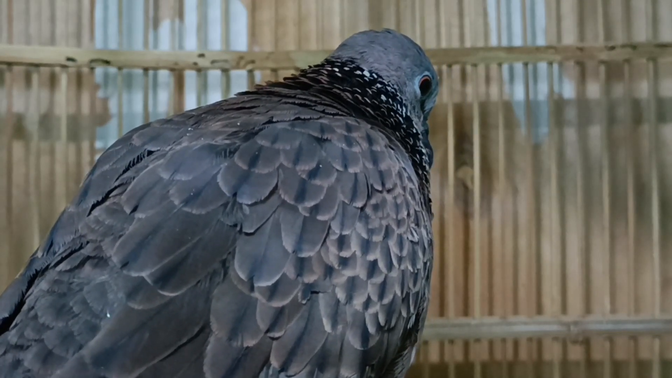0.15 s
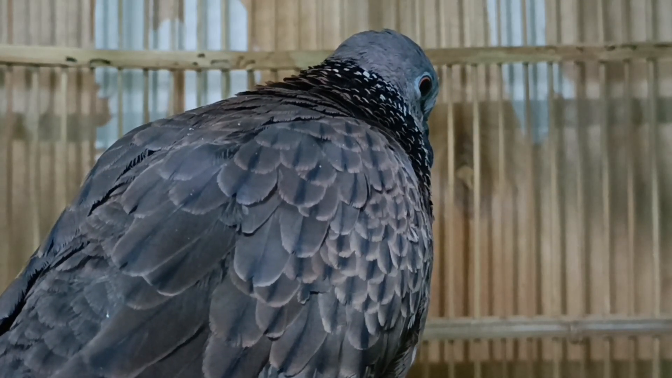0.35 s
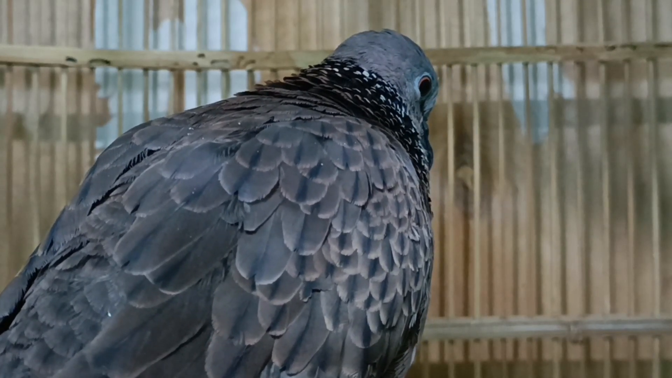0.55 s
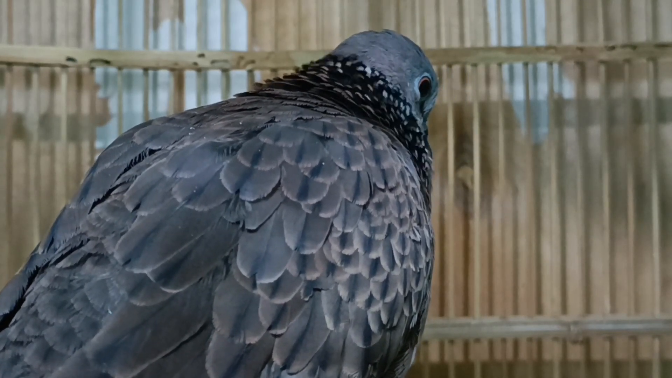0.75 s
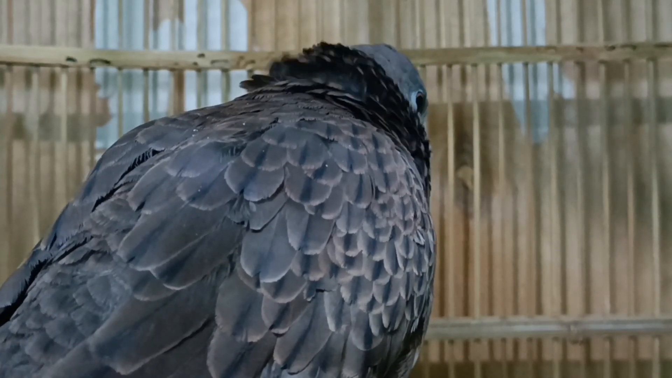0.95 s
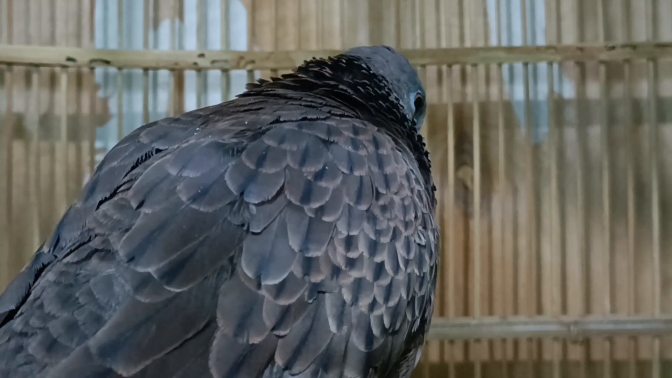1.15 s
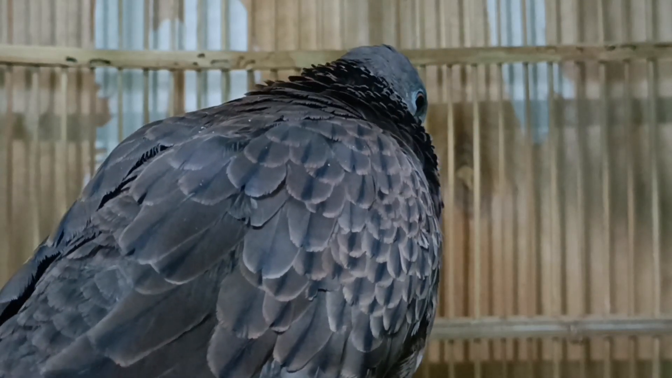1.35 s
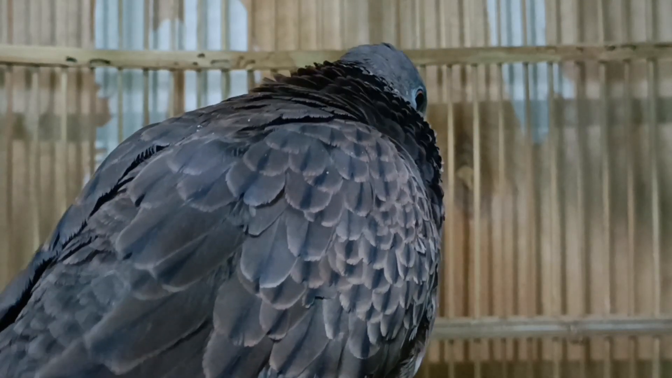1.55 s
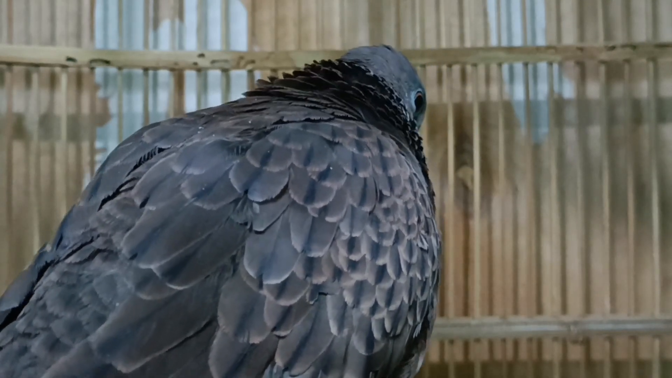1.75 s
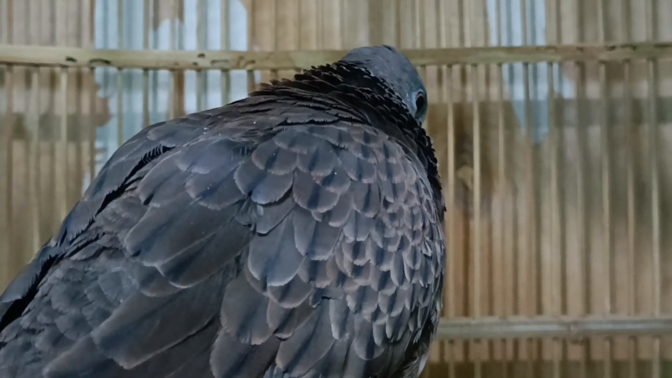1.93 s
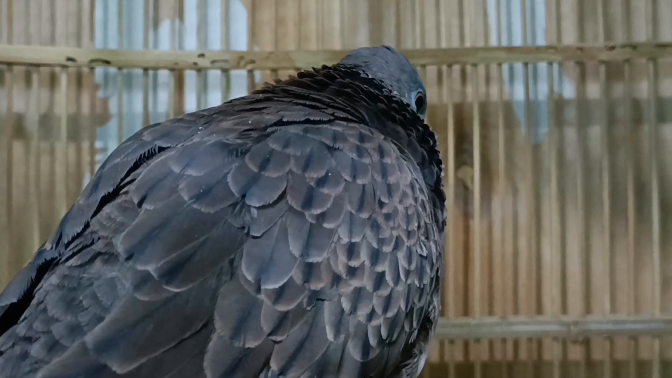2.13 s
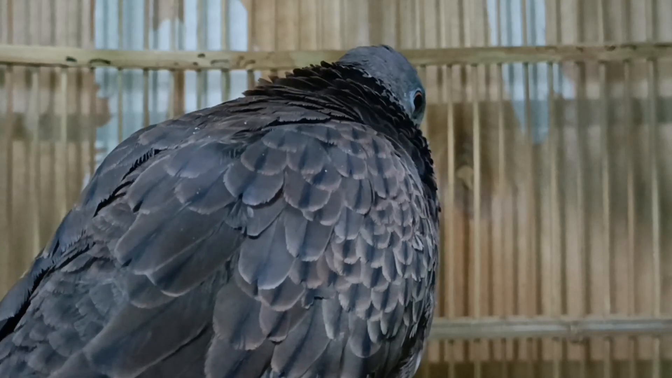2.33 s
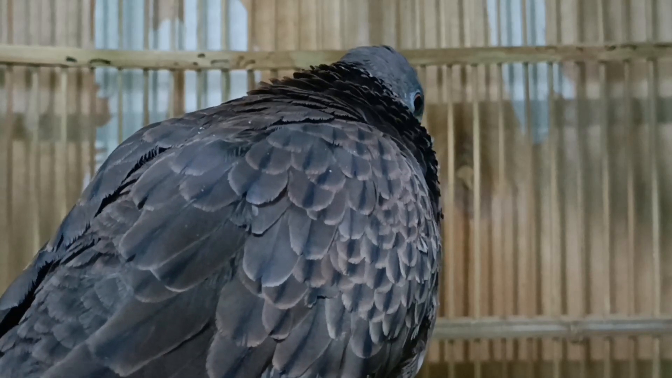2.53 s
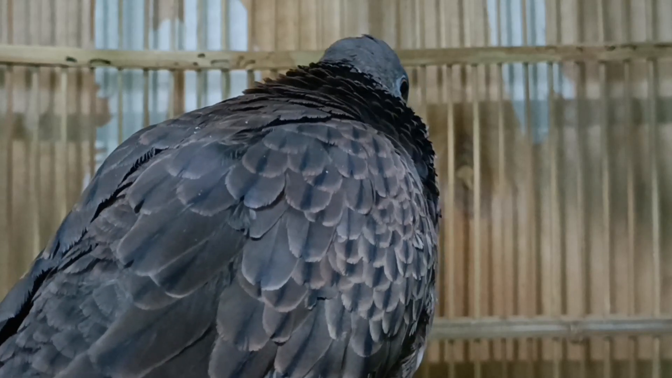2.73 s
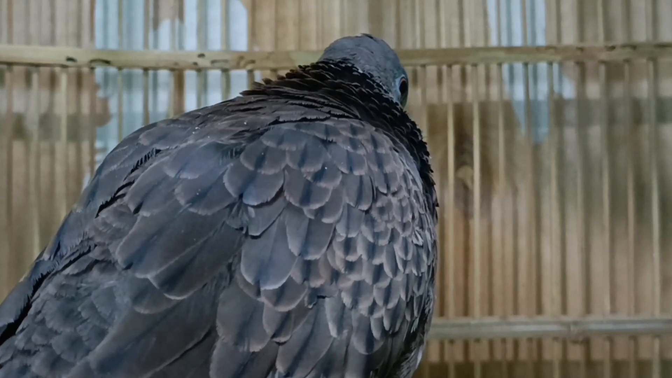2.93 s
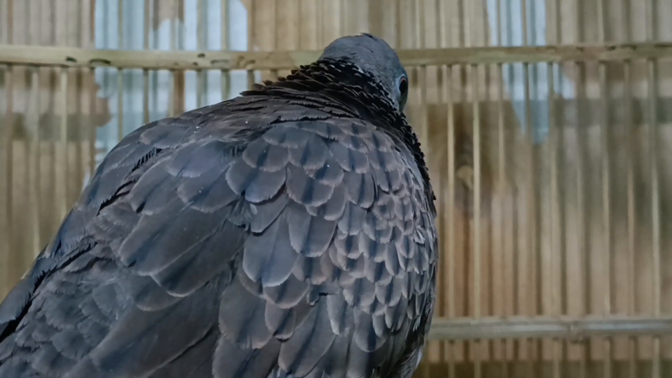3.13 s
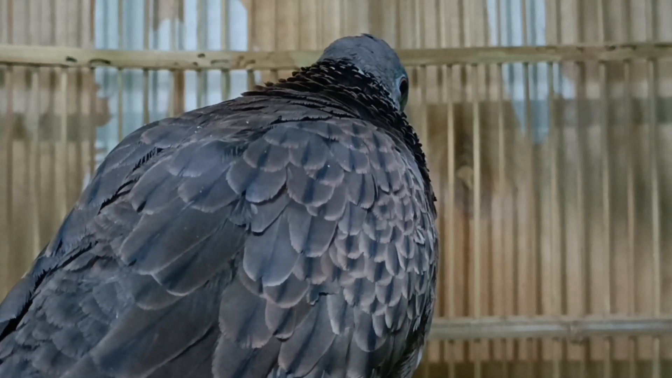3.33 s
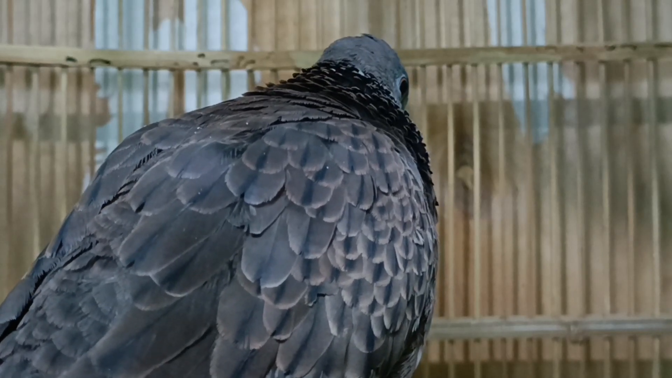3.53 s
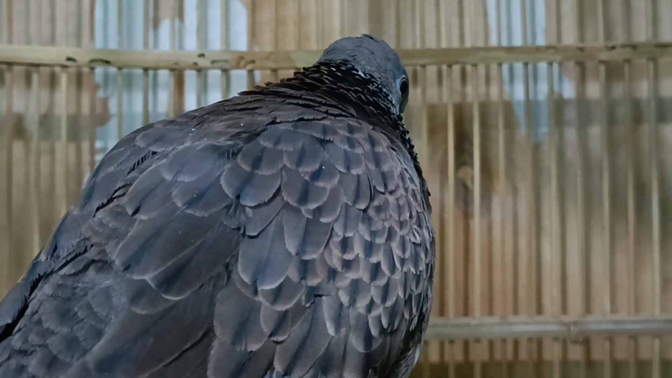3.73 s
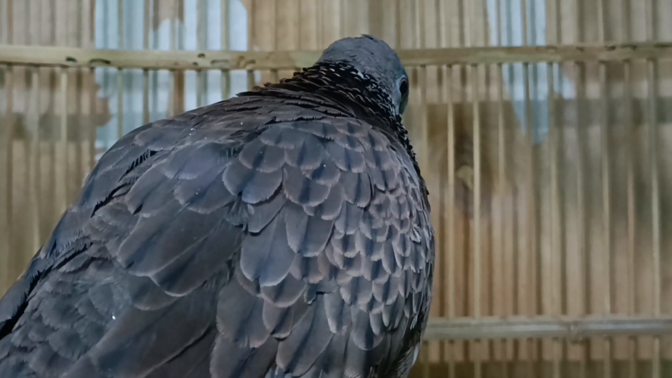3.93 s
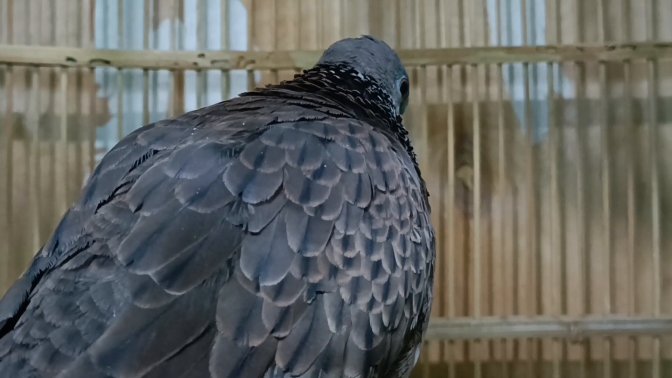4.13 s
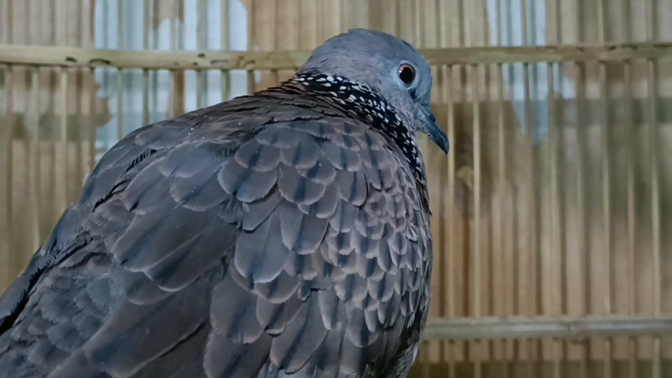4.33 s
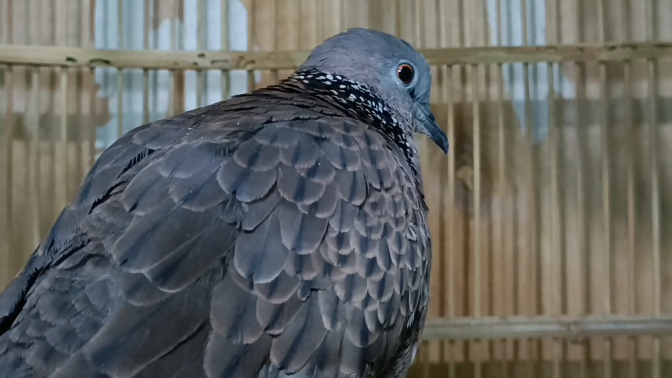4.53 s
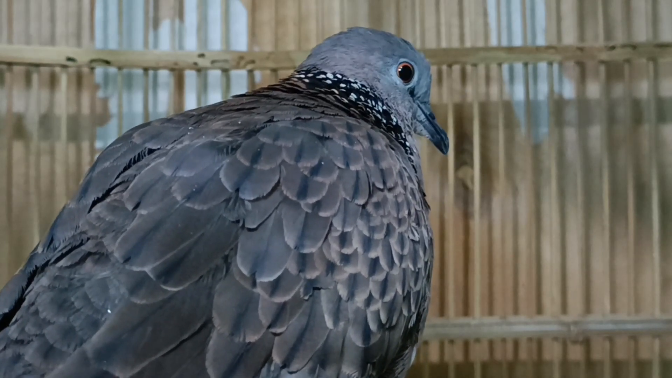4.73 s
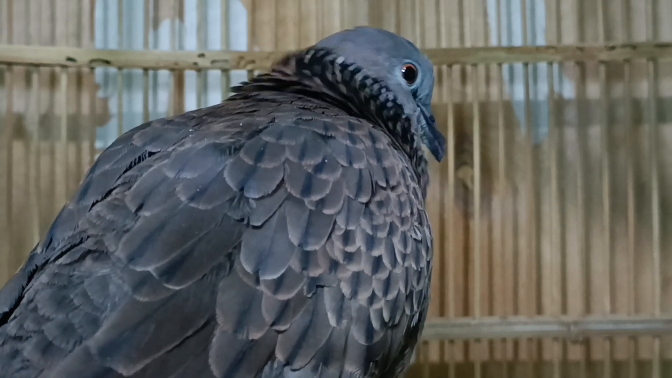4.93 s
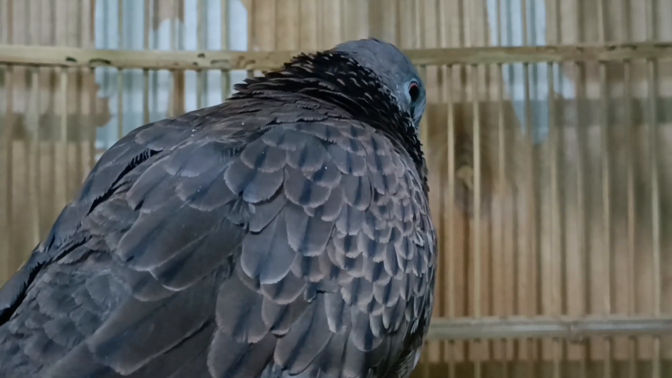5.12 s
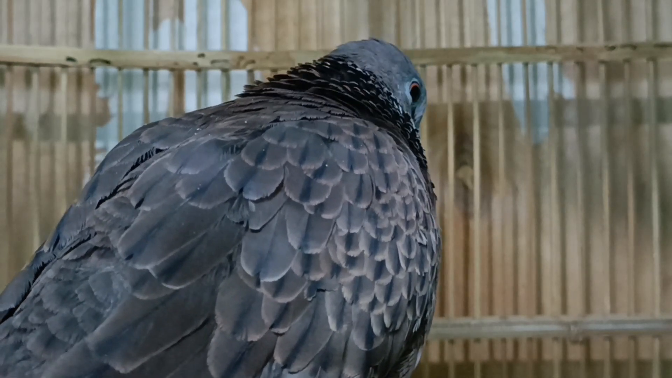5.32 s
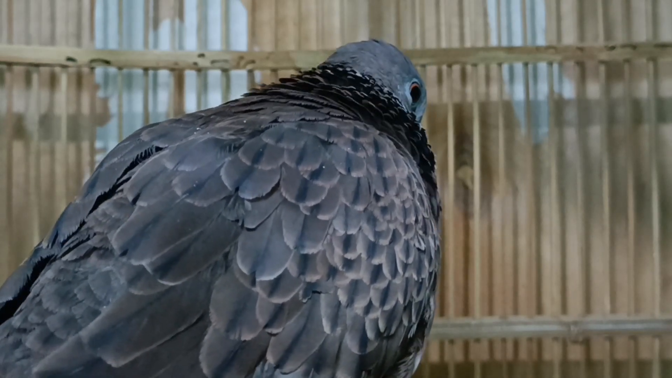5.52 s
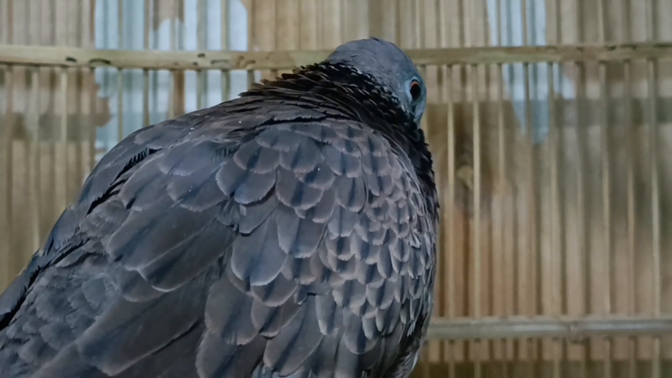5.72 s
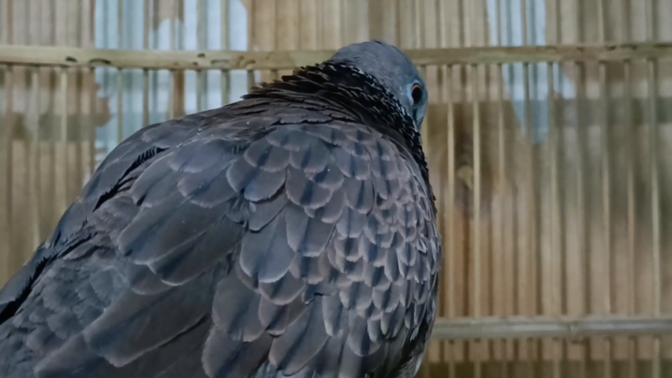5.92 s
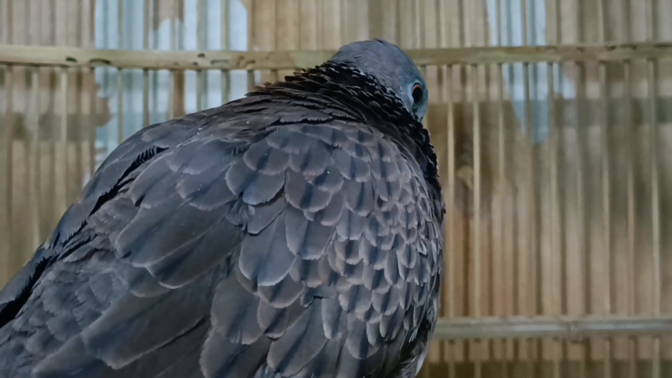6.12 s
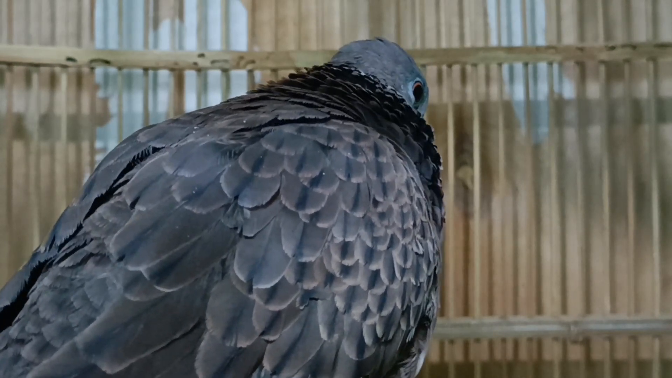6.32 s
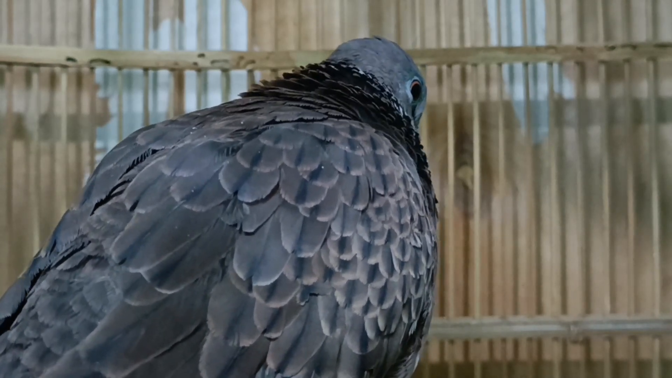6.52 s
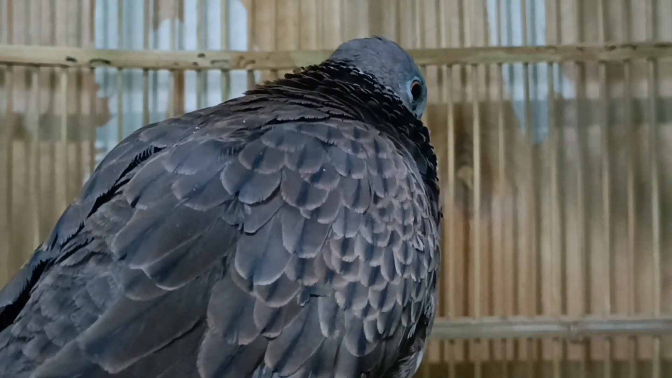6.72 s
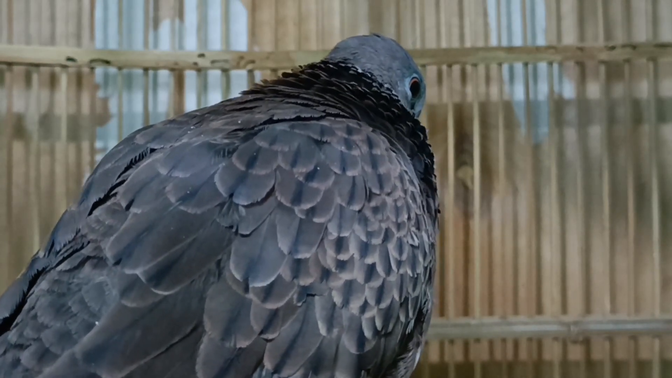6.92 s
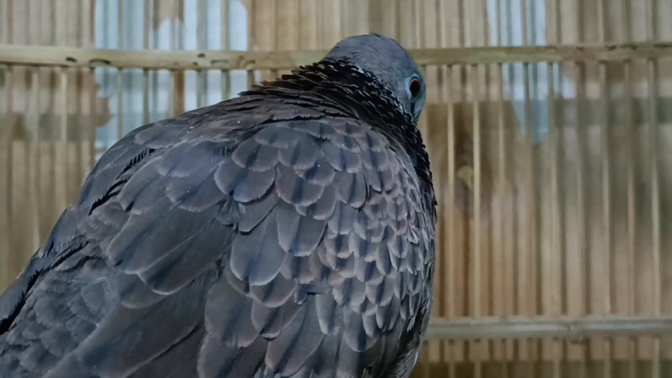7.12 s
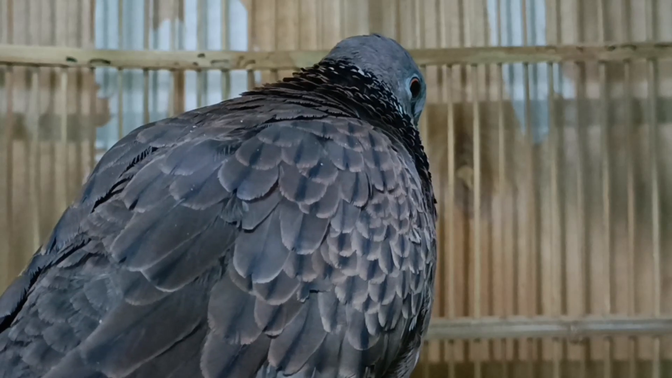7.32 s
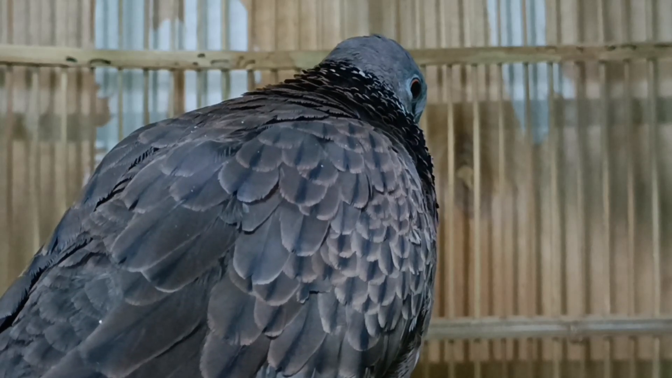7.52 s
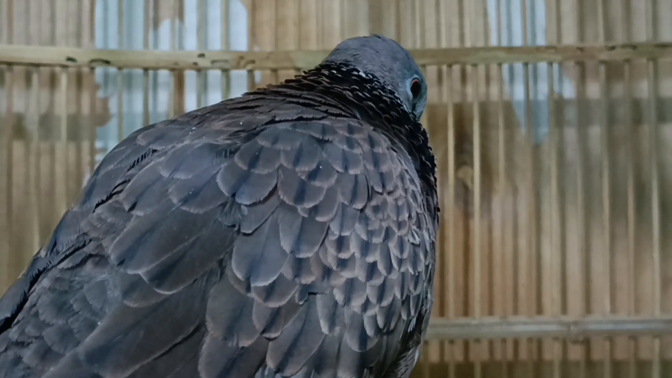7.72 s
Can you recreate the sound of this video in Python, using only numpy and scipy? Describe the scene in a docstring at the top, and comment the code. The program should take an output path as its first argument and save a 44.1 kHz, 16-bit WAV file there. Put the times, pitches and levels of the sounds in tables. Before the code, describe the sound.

A caged dove coos two four-note phrases close by in an echoing room, a distant dove answering faintly over low hum.

```python
"""In an echoing room, a caged spotted dove close by coos two phrases: a short note, an arched coo,
a rolled coo and a low closing coo. Its voice is an almost pure tone with a faint buzz; in a roll its
throat pinches quickly again and again. Nearby walls throw the sound back and the room rings on.
A second dove answers far off, over mains hum and soft rumble and hiss. An automatic volume control
turns everything down on each loud coo, so the background dips and creeps back."""
import sys
import numpy as np
from scipy import signal
from scipy.fft import rfft, irfft, next_fast_len
from scipy.io import wavfile
from scipy.ndimage import uniform_filter1d

SR = 44100
rng = np.random.default_rng(int(sys.argv[2]) if len(sys.argv) > 2 else 0)


def wav_out(sig):
    """Save sig, one row per channel (or a flat mono array), as 16-bit PCM at SR to the path in sys.argv[1]."""
    wavfile.write(sys.argv[1], SR, np.round(np.clip(np.atleast_2d(sig).T, -1, 1) * 32767).astype(np.int16))


N = 346626
TIME = np.arange(N) / SR
SIZE = next_fast_len(N, True)
FREQS = np.fft.rfftfreq(SIZE, 1 / SR)

# tone colour of the rasp in the throat: f/Hz, relative level/dB
THROAT_RASP = [(100, -32), (350, -7), (550, -2.5), (800, 6.5), (1200, -11), (1600, -31.5), (2300, -26.5),
               (4500, -36), (6100, -35.5), (7000, -42.5), (15000, -57)]


def voice(notes, slack_hz=580, taut_hz=750, ring_hz=2880, ring_width_hz=190, ring_db=14):
    """A dove's nearly pure tone: clean when taut and high, hoarse and dull when slack and low."""
    # strength of an overtone by where it falls: f/Hz, relative level/dB
    overtones = [(850, -17), (1150, -22.5), (1450, -39), (1650, -44.5), (2200, -40), (2500, -45),
                 (3000, -47), (3400, -56), (3800, -52.5), (4600, -55), (5300, -63), (6100, -47.5),
                 (6800, -68), (7700, -63), (10200, -58.5), (12000, -70)]
    # hiss of air forced through a roll: f/Hz, relative level/dB
    hiss_colour = [(1100, 3), (1700, -12), (2500, -7), (4500, -11.5), (5600, -7), (6100, 9), (6600, -13),
                   (15000, -29.5)]
    out, pinches = np.zeros(N), throat_roll()
    wobble, rasp = drift(150), noise(THROAT_RASP)
    hiss = noise(hiss_colour) * amp(-38.5) * uniform_filter1d(pinches, size=900)
    for note in notes:
        on, pitch, loudness = coo_shape(*note)
        t, pinch = TIME[on], pinches[on]
        # each pinch pulls pitch and loudness down together and makes the pitch shakier
        jitter = (.003 + .025 * pinch) * wobble[on]
        hz = pitch * (1 - .234 * pinch) * (1 + jitter)
        level = loudness * amp(-9.5 * pinch)
        phase = 2 * np.pi * np.cumsum(hz) / SR
        tilt_db = np.interp(hz, [slack_hz, taut_hz], [-2.5, -.85])
        tone = np.sin(phase)
        for k in range(2, 16):
            # the buzz: even multiples of the pitch are weaker, and each overtone flickers on its own
            buzz_db = read(overtones, k * hz) + tilt_db * (k - 2) - 3.8 * (k % 2 == 0) - 5 * pinch
            if k == 5:  # on the way down, this overtone sweeps through a narrow resonance
                falling = t > t[pitch.argmax()]
                buzz_db += ring_db * np.exp(-((k * hz - ring_hz) / ring_width_hz) ** 2) * falling * (1 - pinch)
            tone += amp(buzz_db + 3.8 * drift(30, t)) * np.sin(k * phase)
        rasp_db = np.interp(hz, [slack_hz, taut_hz], [-21.5, -47])
        hoarse = amp(rasp_db) * rasp[on] + hiss[on]
        out[on] += level * (np.sqrt(2) * tone + hoarse)
    return out


def coo_shape(start, kind, catch, hold, top_hz, effort_db, attack_s=.012, release_s=.008):
    """One coo's pitch and loudness: a soft low start (the catch), a leap, a held arch, a fading fall."""
    # by kind: opening/s, rise/s, fall/s, first pitch/top, last pitch/top, bend of fall, catch level/dB
    shapes = {"short": (.012, .0216, .005, .76, .85, 0, -2.9),
              "arched": (.011, .025, .029, .7, .58, -.15, -17),
              "rolled": (.012, .0102, .186, .812, .6, .4, -4),
              "closing": (.013, .0242, .118, .717, .615, -.03, -15)}
    opening, rise, fall, first, last, bend, catch_db = shapes[kind]
    arch_start, arch_end = .95, .91  # shares of the top pitch
    crest = .375  # how far through the hold the pitch peaks
    risen = catch + rise
    length = risen + hold + fall
    on = (TIME > start) & (TIME < start + length)
    t = TIME[on] - start
    held, sunk = ramp(t - risen, hold), ramp(t - risen - hold, fall)
    leap = (first - arch_start) * (1 - ramp(t - catch, rise))
    from_crest = np.interp(held, [0, crest, 1], [1, 0, 1])
    arch = 1 - np.where(held < crest, 1 - arch_start, 1 - arch_end) * from_crest ** 1.45
    drop = (last - arch_end) * (sunk + bend * sunk * (1 - sunk))
    pitch = top_hz * (leap + arch + drop)
    shut_db = catch_db * (1 - ramp(t - catch, opening))
    slack_db = .112 * np.maximum(680 - pitch, 0) * ramp(t - risen, opening)  # fades below 680 Hz
    edges = np.sin(np.pi / 2 * ramp(t, attack_s) * ramp(length - t, release_s)) ** 2
    return on, pitch, edges * amp(effort_db + shut_db - slack_db)


def throat_roll(snap=2.5, uneven=.22, skew=.15):
    """How far the throat is pinched, from 0 to 1: in a roll it shuts and opens beat after beat."""
    # rolled stretches: start/s, end/s, first beat rate/Hz, last beat rate/Hz
    rolls = [(1.9209, 2.1204, 55.33, 51.88), (6.0282, 6.2236, 40.18, 55.23), (4.12, 4.33, 50, 52),
             (7.61, 7.82, 50, 52)]
    pinch = np.zeros(N)
    strength = np.clip(.85 + uneven * drift(25), 0, 1)
    for start, end, first_rate, last_rate in rolls:
        on = (TIME > start) & (TIME < end)
        rate = np.interp(TIME[on], [start, end], [first_rate, last_rate])
        turn = 2 * np.pi * np.cumsum(rate) / SR
        beats = (1 - np.tanh(snap * np.cos(turn - skew * np.cos(turn)))) / 2
        pinch[on] = beats * signal.windows.tukey(on.sum(), .04)
    return pinch * strength


def grunts():
    """A soft rasp as the throat fills, just before a note finds its pitch."""
    # hoarse starts: t/s, length/s, level/dB
    starts = [(1.35, 0.052, -46.5), (5.145, 0.09, -42.5), (5.472, 0.065, -41.5)]
    swell = sum(amp(db) * np.sin(np.pi * ramp(TIME - s, length)) for s, length, db in starts)
    return swell * noise(THROAT_RASP)


def ticks(decay_s=.0025, gain_db=-3.5):
    """Tiny dry ticks, each a puff of noise that dies in a few milliseconds."""
    # the ticks: t/s, relative level/dB, left minus right/dB
    puffs = [(1.034, -46.5, -12), (1.0879, -40, -2.5), (1.4208, -38, 0.5), (1.4434, -36.5, -5),
             (1.9585, -38.5, -4), (2.115, -36, 3.5), (5.133, -47, -5), (5.5342, -37, 3.5),
             (5.5513, -35.5, -13), (6.0731, -39, 10), (6.2473, -42, 7)]
    # their tone colour: f/Hz, relative level/dB
    colour = [(100, -8.5), (1000, 3.5), (2200, -1), (4000, -2.5), (7000, -8), (15000, -24.5)]
    level = np.zeros((2, N))
    for s, db, balance_db in puffs:
        on = (TIME > s) & (TIME < s + .02)
        level[:, on] += pan(balance_db) * amp(db + gain_db) * np.exp(-(TIME[on] - s) / decay_s)
    return level * noise(colour)


def walls(x, dull_hz=2200):
    """The direct sound plus duller echoes, which boost or cancel it as the pitch slides."""
    # bounces off nearby walls: delay/s, left gain, right gain
    bounces = [(0.00171, -0.017, 0.36), (0.0041, -0.359, 0.136), (0.00653, 0.695, 0.155),
               (0.00969, 0.111, -0.245), (0.01727, 0.186, -0.086), (0.0174, 0.157, 0.136),
               (0.03255, -0.08, -0.04), (0.0333, 0.193, 0.183)]
    echoes = sum(np.outer([left, right], np.exp(-2j * np.pi * FREQS * delay))
                 for delay, left, right in bounces)
    dulled = echoes / np.hypot(1, (FREQS / dull_hz) ** 2)
    return irfft(rfft(x, SIZE) * (1 + dulled), SIZE)[:, :N]


def room(x, build_up_s=.017, shared=.52, linger=1):
    """The room rings on: countless blurred echoes, partly alike in both ears, the treble dying first."""
    # time to fade by 60 dB, before linger stretches it: f/Hz, t/s
    fade_times = [(200, 0.4), (700, 0.46), (1500, 0.43), (6000, .2)]
    common, *own = rng.standard_normal((3, SR))
    hz, t, bands = signal.stft(shared * common + (1 - shared) * np.array(own), SR, nperseg=256)
    fade = amp(-60 * t / (linger * read(fade_times, hz)[:, None]))
    swell = 1 - np.exp(-t / build_up_s)
    tail = signal.istft(bands * fade * swell, SR, nperseg=256)[1]
    coo_gain = np.sqrt(np.mean(abs(rfft(tail, SR)[:, 500:850]) ** 2))  # coos lie around 500-850 Hz
    return signal.fftconvolve(x[None], tail / coo_gain, axes=1)[:, :N]


def far_dove():
    """A second dove, so far off that only its long echo is heard."""
    # its notes: t/s, kind, catch/s, hold/s, top pitch/Hz, effort/dB
    answers = [(3.55, "short", .015, .02, 660, -58), (3.79, "arched", .015, .18, 795, -50.5),
               (4.09, "rolled", .02, .25, 825, -51), (7.27, "arched", .015, .19, 795, -49.5),
               (7.58, "rolled", .02, .25, 810, -52.5)]
    return room(voice(answers), build_up_s=.06, linger=1.6)


def hum(waver_db=2.1, lag_s=.00024):
    """Wavering mains hum from the right, reaching the left ear a little later."""
    # the hum's tones: f/Hz, level at the start/dB, level at the end/dB
    tones = [(100.3, -48.4, -46.8), (200.3, -56.3, -48.8), (298, -64, -62.5), (400.8, -64, -62),
             (483, -70.5, -73.5)]
    clock, out = TIME - np.array([[lag_s], [0]]), 0
    for hz, first_db, last_db in tones:
        level = amp(np.linspace(first_db, last_db, N) + waver_db * drift(8))
        out = out + level * np.sin(2 * np.pi * hz * clock + .35 * drift(6.7))
    return np.sqrt(2) * out * pan(balance_db=-2.5)


def air(level_db=-53, lag_s=.00048):
    """Low rumble and soft hiss of the surroundings, mostly from the right."""
    # tone colour: f/Hz, relative level/dB
    colour = [(25, -29), (62, -19.5), (80, -12), (120, -14.5), (155, -5.5), (185, -11.5), (250, -15),
              (400, -18), (565, -23.5), (1100, -30.5), (2000, -28), (4000, -37.7), (8000, -47),
              (15400, -48.5)]
    # how alike the two sides are: f/Hz, likeness from 0 to 1
    likeness = [(60, .94), (150, .95), (380, .3), (950, .2), (2380, .2), (5980, .15), (15000, .05)]
    # which side is louder: f/Hz, left minus right/dB
    balance = [(60, -2.5), (150, -5.5), (380, -0.5), (950, -0.5), (2380, 0), (5980, -1.5), (15000, 1)]
    same = read(likeness, FREQS)
    right, other = rfft(rng.standard_normal((2, SIZE))) * amp(read(colour, FREQS))
    left = (same * right + np.sqrt(1 - same ** 2) * other) * np.exp(-2j * np.pi * FREQS * lag_s)
    pair = irfft(np.array([left, right]) * pan(read(balance, FREQS)), SIZE)[:, :N]
    return unit(pair) * amp(level_db)


def amp(db):
    """Turns decibels into a gain to multiply by."""
    return 10 ** (np.asarray(db) / 20)


def unit(x):
    """Scales a signal to an average strength (rms) of 1."""
    return x / np.sqrt(np.mean(x ** 2) + 1e-20)


def read(points, hz):
    """Reads between (Hz, value) points, with octaves evenly spaced."""
    f, value = np.transpose(points)
    return np.interp(np.log(hz + 1), np.log(f + 1), value)


def pan(balance_db):
    """Left and right gains; above zero, the left is louder."""
    return amp(np.array([[.5], [-.5]]) * balance_db)


def noise(colour):
    """Noise of strength 1 with the given tone colour."""
    white = rfft(rng.standard_normal(SIZE))
    return unit(irfft(white * amp(read(colour, FREQS)), SIZE)[:N])


def drift(rate_hz, t=TIME):
    """Random wandering, up to about the given rate."""
    knots = rng.standard_normal(4000)
    return unit(np.interp(t * rate_hz * 2, np.arange(len(knots)), knots))


def ramp(t, length):
    """Climbs from 0 to 1 over the given time."""
    return np.clip(t / length, 0, 1)


def scene():
    """The near dove in its room, the far dove and the background."""
    # the near dove's notes: t/s, kind, catch/s, hold/s, top pitch/Hz, effort/dB
    coos = [(1.064, "short", .0165, .0085, 740, -16.8), (1.3931, "arched", .02, .2018, 779, -7.5),
            (1.901, "rolled", .044, .2072, 787, -8), (2.597, "closing", .0192, .097, 726, -9.5),
            (5.162, "short", .001, .002, 640, -22), (5.185, "short", .002, .035, 775, -36),
            (5.5083, "arched", .0075, .2105, 780.5, -6.8), (6.014, "rolled", .029, .218, 787, -7.8),
            (6.7049, "closing", .0215, .097, 726, -9.8)]
    dove = voice(coos) + grunts()
    near = walls(dove) * pan(balance_db=.4) + ticks()
    return near + room(amp(-11.3) * dove) + far_dove() + hum() + air()


def record(dry, loud_db=-6.9, recovery_db_per_s=3.5, squeeze=.88, cutoff_hz=15500):
    """The volume drops at once on a loud coo and creeps back; the highest treble is cut off."""
    peak_db = 20 * np.log10(abs(dry).max(0) + 1e-9)
    creep = recovery_db_per_s * TIME
    held_db = np.maximum.accumulate(peak_db + creep) - creep  # holds each peak, then slowly lets go
    over_db = np.maximum(held_db - loud_db, 0)
    ducked = dry * amp(-squeeze * uniform_filter1d(over_db, size=200))
    low_pass = signal.firwin(511, cutoff_hz, window=("kaiser", 9), fs=SR)
    return signal.oaconvolve(ducked, low_pass[None], "same")


dry = scene()
out = record(dry)
wav_out(out)
```